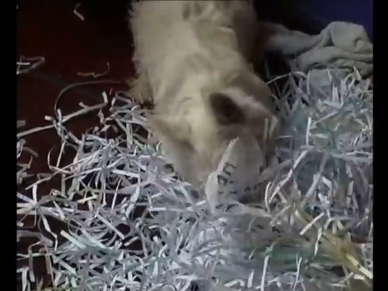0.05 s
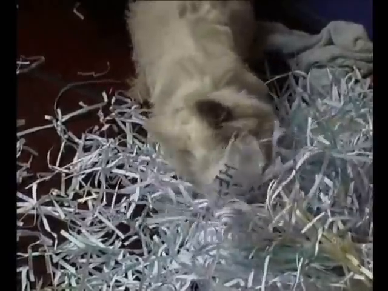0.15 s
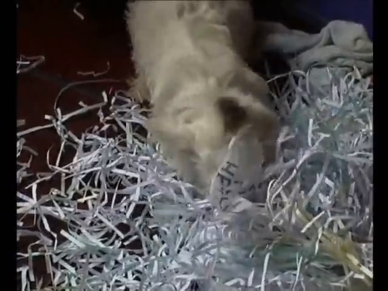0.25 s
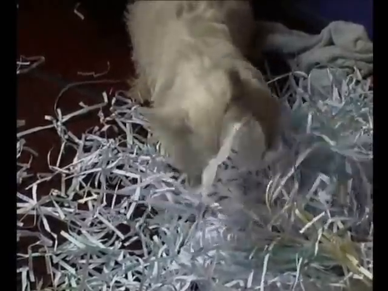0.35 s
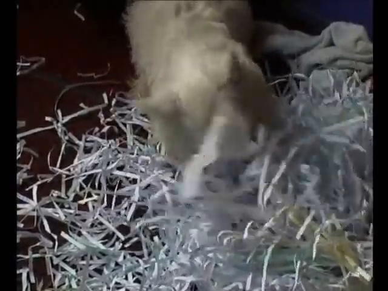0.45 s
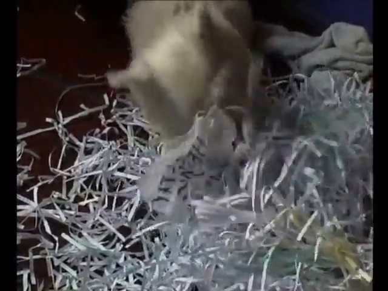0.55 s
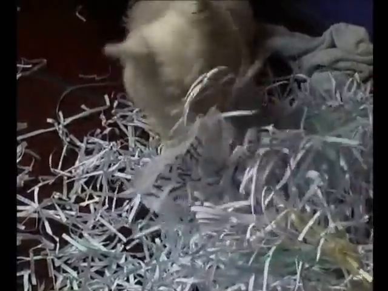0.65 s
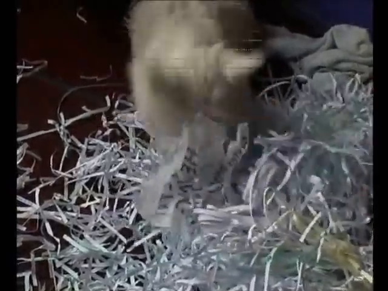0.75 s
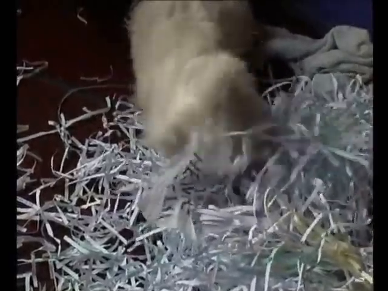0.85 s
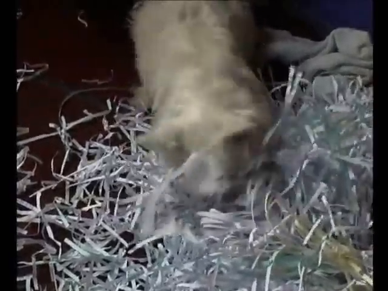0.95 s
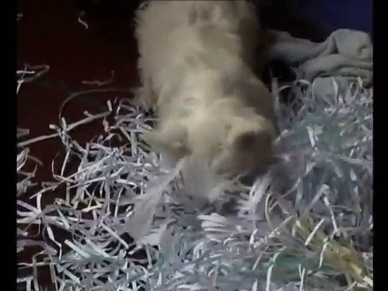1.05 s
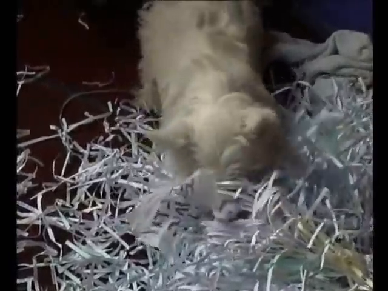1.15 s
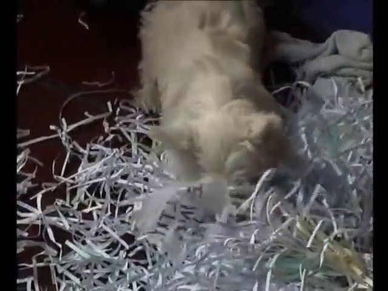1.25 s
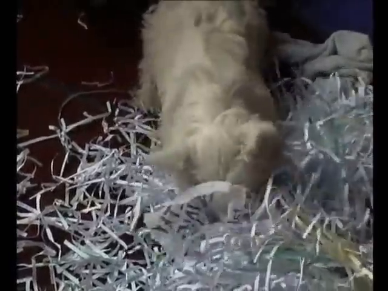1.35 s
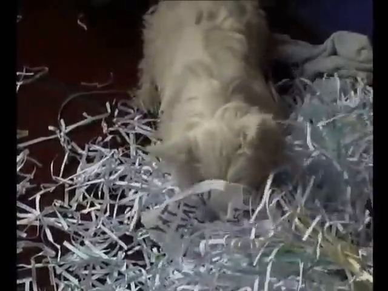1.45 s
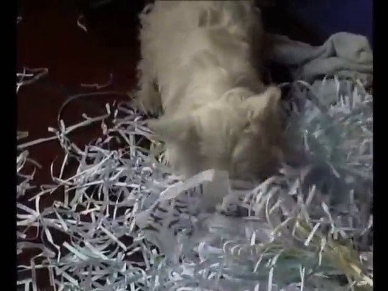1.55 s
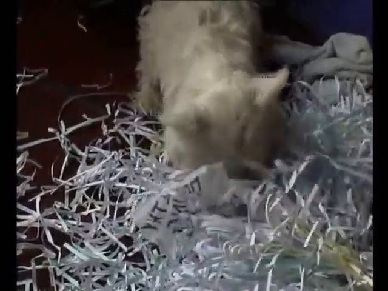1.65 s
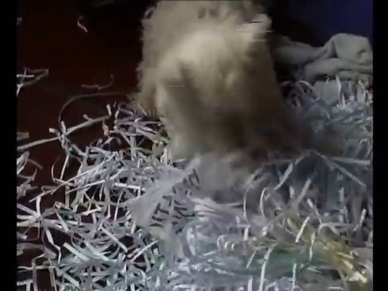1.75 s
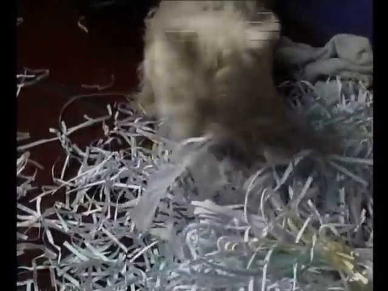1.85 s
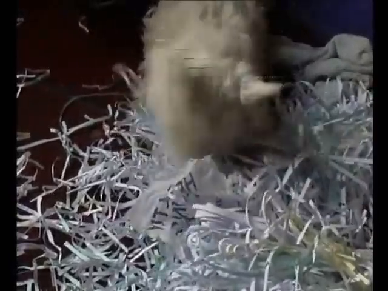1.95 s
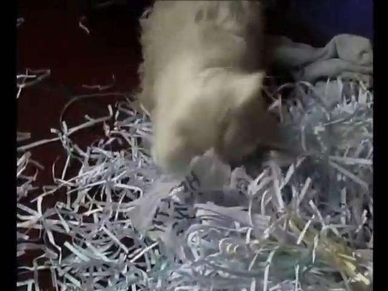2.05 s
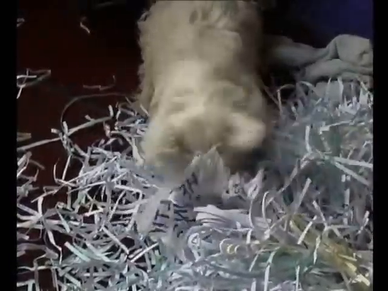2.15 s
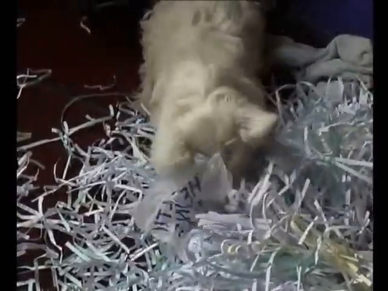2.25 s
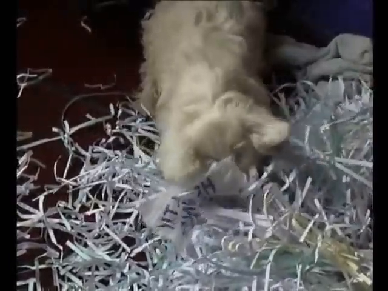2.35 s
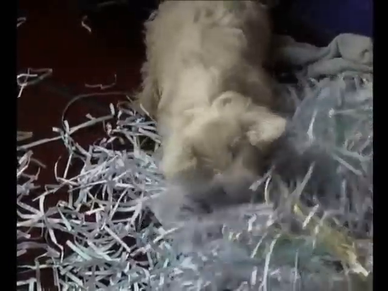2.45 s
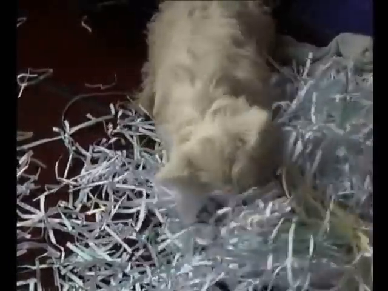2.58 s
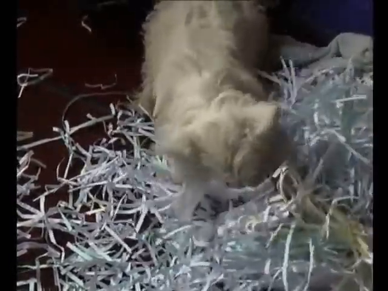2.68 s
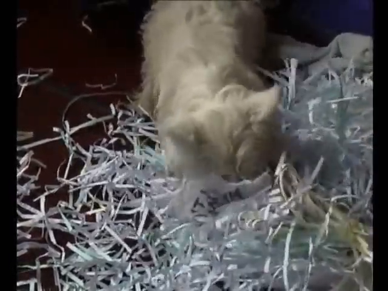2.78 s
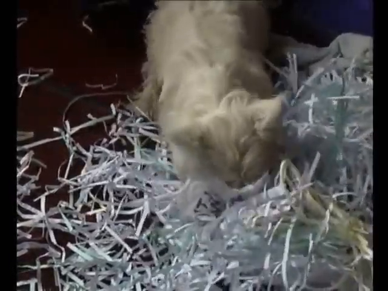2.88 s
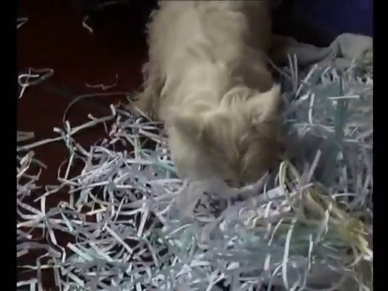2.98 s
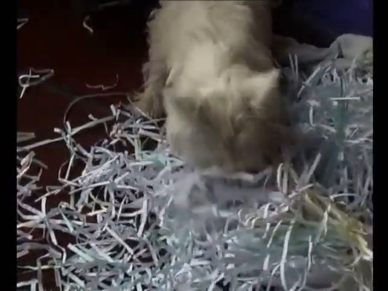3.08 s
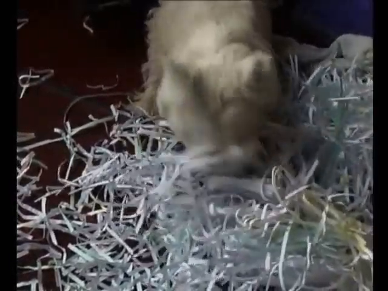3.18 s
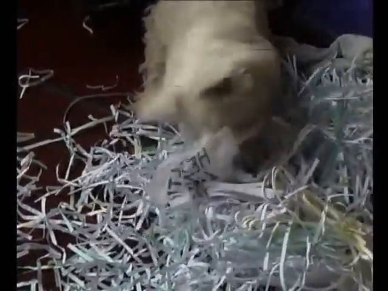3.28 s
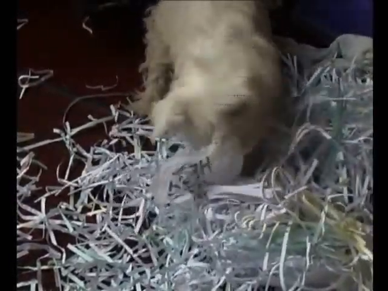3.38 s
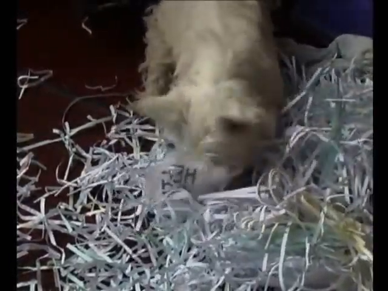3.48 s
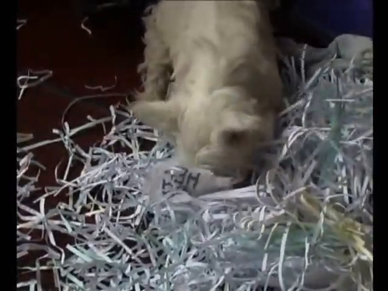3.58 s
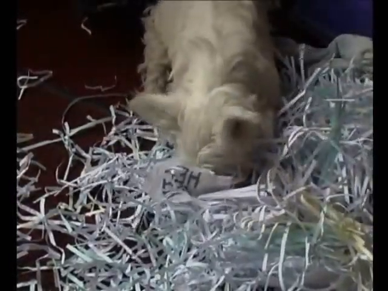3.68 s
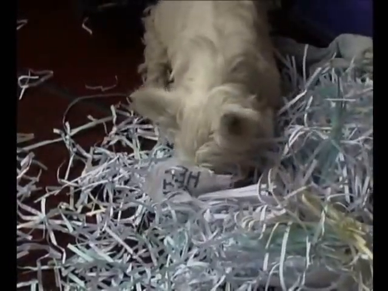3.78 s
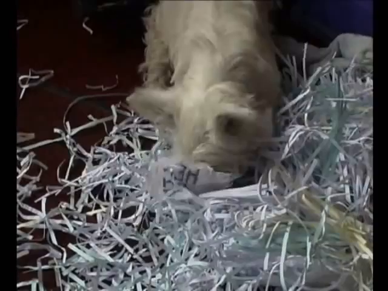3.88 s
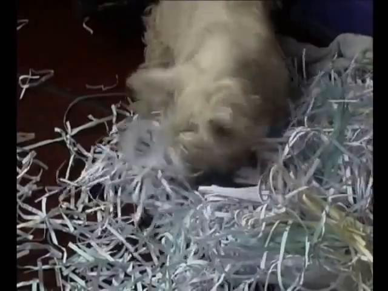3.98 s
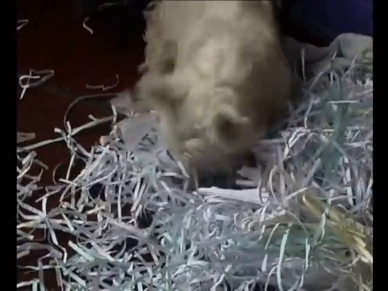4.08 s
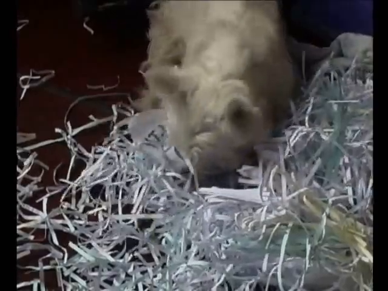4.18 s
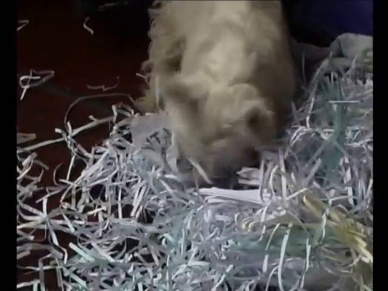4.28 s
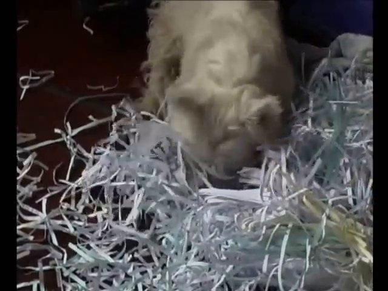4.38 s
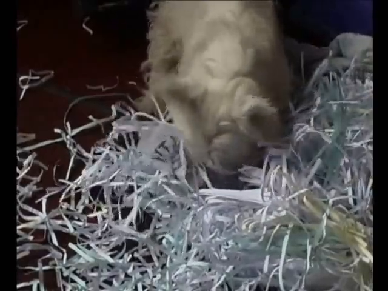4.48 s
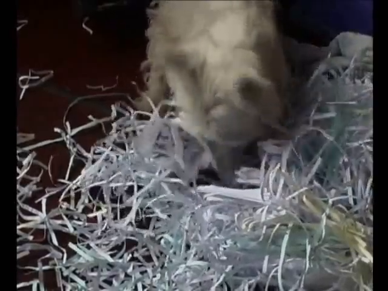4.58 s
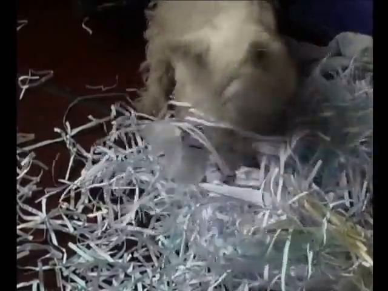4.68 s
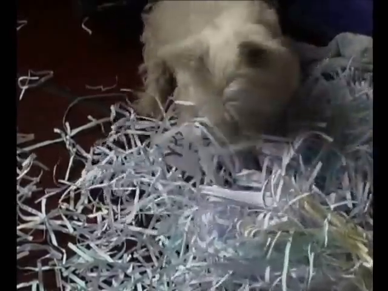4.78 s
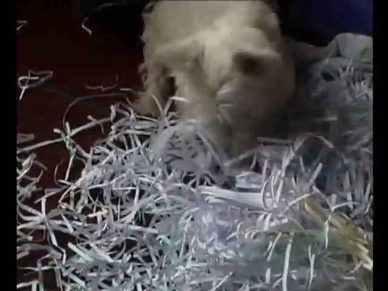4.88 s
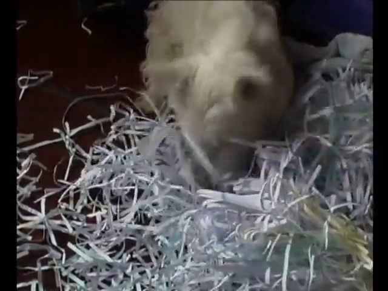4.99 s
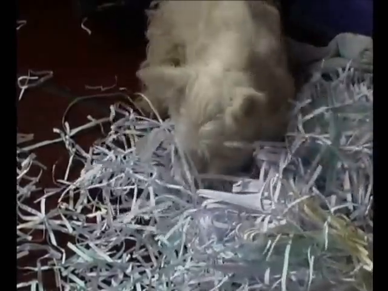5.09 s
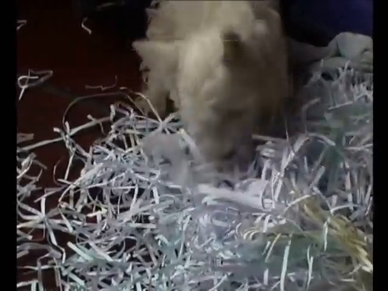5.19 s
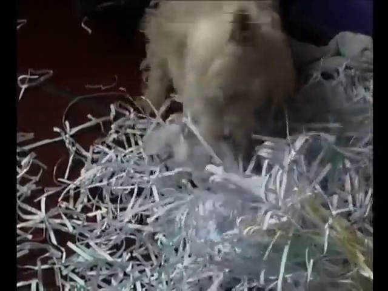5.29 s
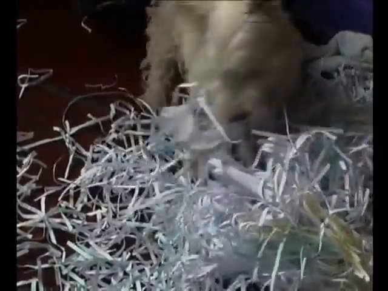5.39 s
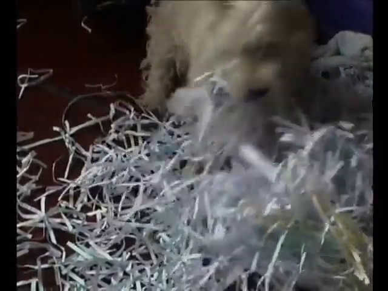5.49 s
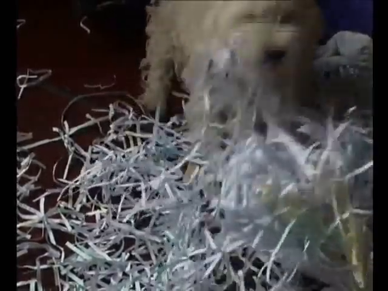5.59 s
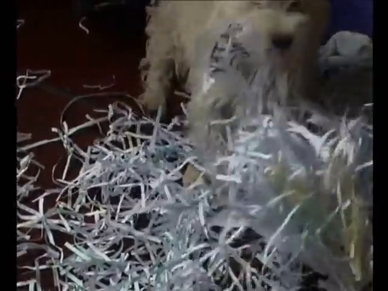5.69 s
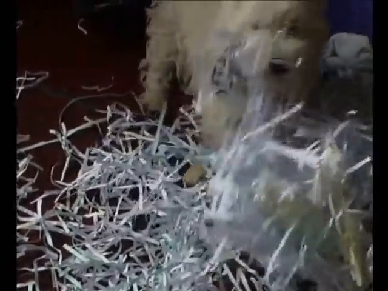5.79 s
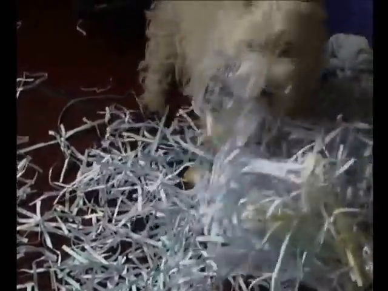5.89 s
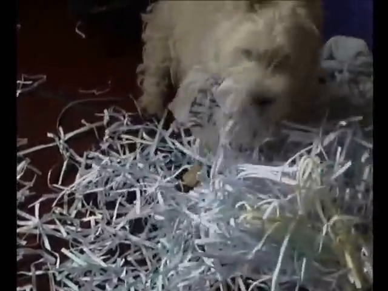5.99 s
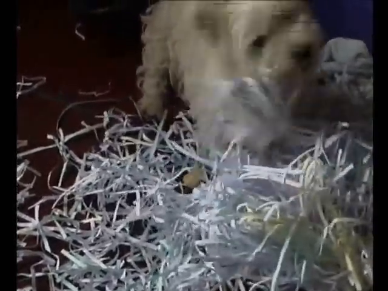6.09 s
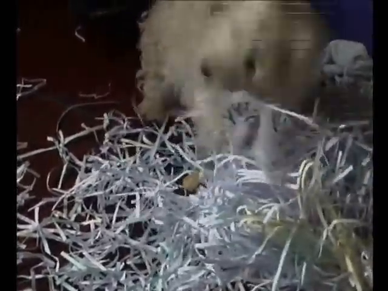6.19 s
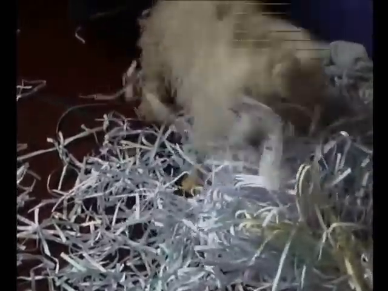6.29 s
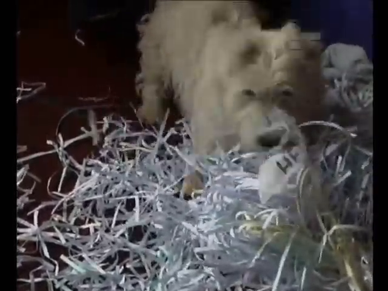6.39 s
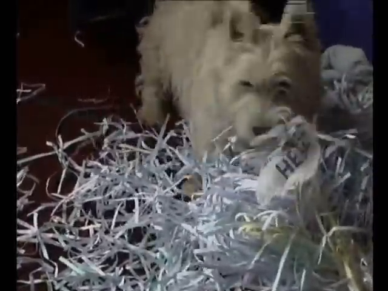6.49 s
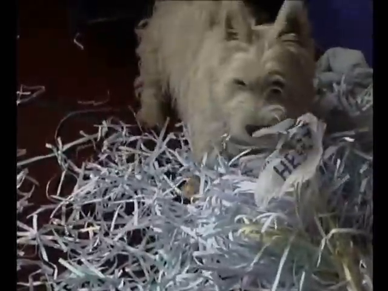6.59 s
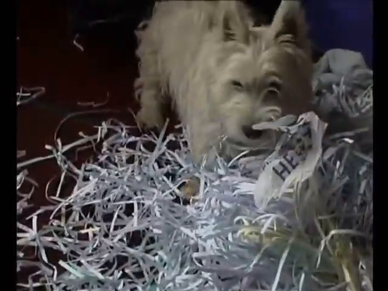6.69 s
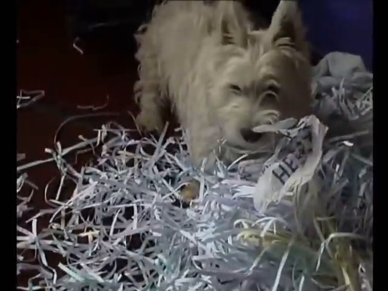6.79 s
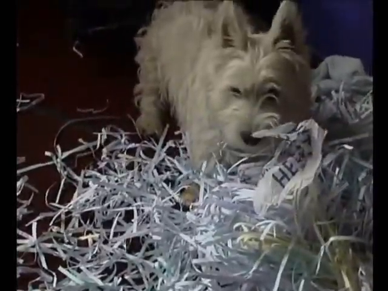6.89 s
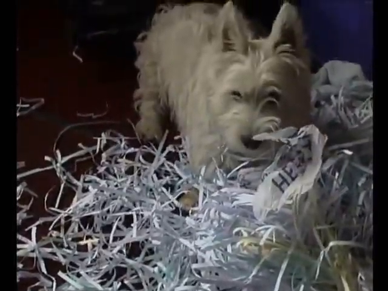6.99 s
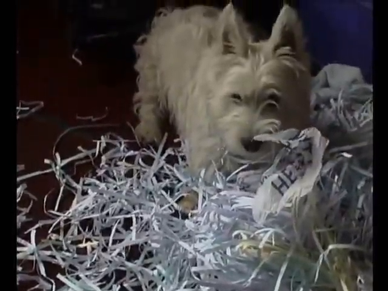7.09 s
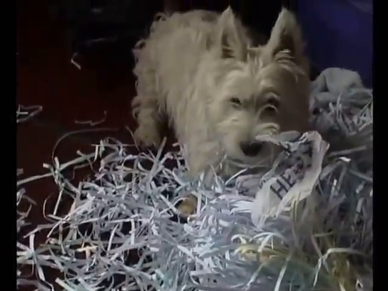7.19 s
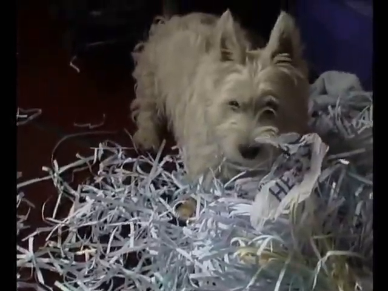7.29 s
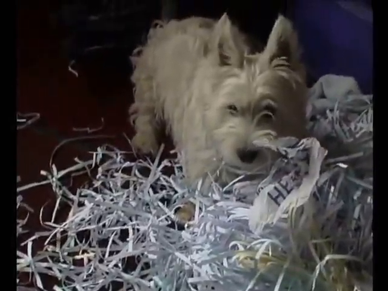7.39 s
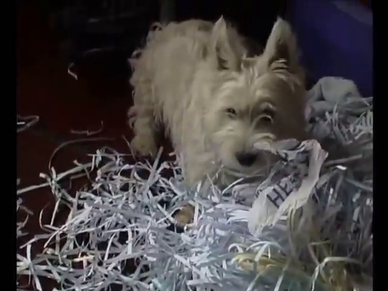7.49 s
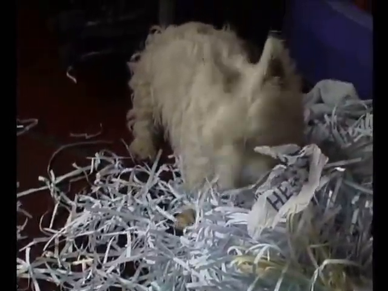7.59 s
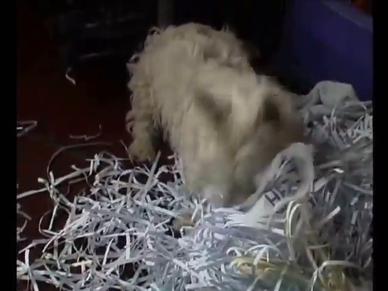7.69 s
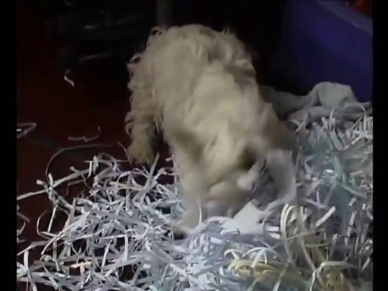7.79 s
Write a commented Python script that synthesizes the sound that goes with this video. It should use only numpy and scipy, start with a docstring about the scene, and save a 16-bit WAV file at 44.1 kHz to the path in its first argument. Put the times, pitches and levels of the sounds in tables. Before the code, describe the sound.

In a small, quiet room, a small dog stirs a heap of shredded paper on a wooden floor about a metre from a stereo microphone. From 0 to 1.2 seconds the strips rustle lightly in uneven shoves. A stronger crackling burst comes near 1.4, with a paw thud and claw tap around 1.8 to 1.9, then the strongest rustles at about 2.5. Shorter strokes continue, dipping briefly near 3.4 and 3.9. Stirring builds from 4.1, with a cluster of knocks and a thud near 4.75. A hard flurry at 5.3 to 5.7 mixes dense crackle, sharp claw taps and snapping strips. Rustling thins out by 6.5, leaving sparse ticks, faint air and a steady low hum. Around 7.1 to 7.7 there are tiny snaps and a soft thud, then a final moderate rustle at 7.8.

```python
"""Small dog in shredded paper

A small dog noses and paws through a heap of shredded paper on a wooden floor, a metre away.
Strips hiss and crackle (filtered noise and random clicks), claws knock (damped floor modes), paws thud
(low decaying sines), kinks snap (noise ticks) and a scrap in its mouth squeaks (resonated slips).
The dog pauses, then dives in again; a low hum (sine) and faint air noise fill the small room."""
import sys
import numpy as np
from scipy import signal
from scipy.fft import rfft, irfft
from scipy.io import wavfile
from scipy.ndimage import uniform_filter1d

SR = 44100
rng = np.random.default_rng(int(sys.argv[2]) if len(sys.argv) > 2 else 0)


def master_out(mix):
    """Clip the mix to full scale and print it as 16-bit PCM to the path in sys.argv[1]."""
    frames = np.transpose(np.atleast_2d(mix))
    ceiling = np.clip(frames, -1, 1)
    pcm = np.round(ceiling * 32767).astype(np.int16)
    wavfile.write(sys.argv[1], SR, pcm)


N = 346185
T = np.arange(N) / SR

# spectrum of the strips: (frequency [Hz], relative density [dB per Hz])
PAPER_SPECTRUM = [(90, -9), (200, -4.5), (350, -6), (480, -4.2), (620, -2.5), (900, -1.5), (1300, -2.5),
                  (1850, 0.5), (2600, -0.1), (4200, -.7), (6700, 0), (8200, -2.5), (10500, -6),
                  (13000, -15)]
# stereo width of the rustle by frequency: (frequency [Hz], side relative to mid [dB])
RUSTLE_WIDTH = [(200, -3.5), (360, -4.5), (660, -10), (1210, -4.5), (2210, -6), (3600, -4.5), (5500, -11),
                (8000, -7.5), (11000, -6.5)]


def rustle():
    """Harder stirring makes more and louder clicks over the hiss of sliding strips."""
    level_db, body_gain, crisp_gain = stirring()
    clicks_per_s = 220 * undb(.7 * (level_db + 55.5))
    grains = crinkle(clicks_per_s, spread_db=3.0, flutter_db=1.5, scatter_db=2.5, scatter_t60_s=0.11)
    slide = undb(2.5) * rng.standard_normal((2, N))
    moving = (grains + slide) * catches(rate_hz=60, t60_s=0.18, depth=0.19)
    mid, side = colour(moving, PAPER_SPECTRUM)
    side = colour(side[None], RUSTLE_WIDTH)
    paper = (mid + side * np.array([[1], [-1]])) / mid.std()
    deep = below(paper, hz=1430)
    crisp = paper - below(paper, hz=8200)
    balanced = paper + (body_gain - 1) * deep + (crisp_gain - 1) * crisp
    return undb(level_db + 1.02) * balanced


# shoves of nose or paw; levels before the overall trim in rustle:
# (time at full force [s], hold [s], level [dB], rise [s], release t60 [s],
#  body of the packed layers [dB], crispness of the strips [dB])
STROKES = [(0.046, 0.01, -57.5, 0.14, 0.31, -1.5, -1), (0.309, 0.01, -58.5, 0.24, 0.17, -2, -3),
           (0.538, 0.12, -50.5, 0.18, 0.6, -0.5, 2.5), (0.912, 0.015, -61.5, 0.21, 0.5, 3.5, 6.5),
           (1.112, 0.12, -53.5, 0.21, 1.4, 0, -1.5), (1.379, 0.019, -42.5, 0.086, 0.55, -2, -4),
           (1.569, 0.1, -51.5, 0.064, 0.76, -2, -2), (1.778, 0.11, -47.5, 0.07, 0.2, -1.5, 1.5),
           (2.102, 0.16, -61.0, 0.22, 0.7, 3, 0.5), (2.367, 0.01, -54.0, 0.07, 0.21, -1.5, -1.5),
           (2.494, 0.01, -47.0, 0.14, 0.31, -1.5, -3.0), (2.56, 0.043, -41.0, 0.12, 0.39, -2.5, -0.5),
           (2.74, 0.13, -52, 0.13, 0.24, -0.5, -0.5), (2.946, 0.032, -48.5, 0.09, 0.39, -0.5, -2.5),
           (3.199, 0.048, -51.5, 0.15, 0.64, 2, -1), (3.385, 0.075, -68, 0.04, 0.42, 8, 6.5),
           (3.499, 0.092, -50.0, 0.053, 0.63, -3, -1.5), (3.855, 0.022, -63.5, 0.028, 0.094, 2.0, -2.5),
           (3.915, 0.015, -65, 0.027, 0.26, 5.0, -1.0), (4.077, 0.057, -47.0, 0.12, 0.55, -1, -0.5),
           (4.24, 0.017, -53.5, 0.037, 0.3, -6.0, 1.5), (4.38, 0.043, -57.0, 0.086, 0.39, -0.5, 2),
           (4.464, 0.042, -51.0, 0.035, 0.54, 0, -0.5), (4.589, 0.017, -49.5, 0.06, 0.76, -0.5, 0.5),
           (4.711, 0.079, -46.5, 0.076, 0.53, 3, 1), (5.04, 0.081, -56, 0.16, 0.36, 0.5, 1),
           (5.148, 0.048, -49.0, 0.04, 0.096, -1.5, 0.5), (5.349, 0.093, -44, 0.2, 0.53, 0.5, -3.5),
           (5.536, 0.21, -43.5, 0.062, 0.26, 0.5, 0), (5.83, 0.12, -54.0, 0.05, 1.01, -0.0, -0.0),
           (6.182, 0.0095, -54.5, 0.065, 0.31, 1.5, -0.5), (6.32, 0.01, -56.5, 0.26, 0.47, 1.5, -1.5),
           (6.393, 0.0093, -59.5, 0.045, 0.85, 4, 2.0), (7.813, 0.1, -53.0, 0.13, 0.4, 2.0, 0)]
# spells of light stirring, muzzle in the heap: (start [s], end [s], level [dB])
NOSING = [(0, 3.76, -64), (4.1, 6.36, -68)]
NOSING_RISE_S, NOSING_RELEASE_T60_S, NOSING_BODY_DB = 0.2, .6, 2
# loose strips thrown up by a movement fall back after it, fainter and crisper
FALLBACK_DB, FALLBACK_T60_S, FALLBACK_CRISP_DB = -18.4, 0.51, 4.5
REST_DB = -88  # faint ticking of the heap left alone


def stirring():
    """Movements add in power; returns heap level [dB] and the gains of its body and crisp top."""
    moves = []
    for s, hold, db, rise, t60, body_db, crisp_db in STROKES:
        moves.append((push(s, hold, db, rise, t60), body_db, crisp_db))
    for start, end, db in NOSING:
        power = push(start, end - start, db, NOSING_RISE_S, NOSING_RELEASE_T60_S)
        moves.append((power, NOSING_BODY_DB, 0))
    pressed = sum(power for power, _, _ in moves)
    loose = undb(FALLBACK_DB) ** 2 * linger(pressed, FALLBACK_T60_S) + undb(REST_DB) ** 2
    total = pressed + loose
    body = sum(power * undb(body_db) ** 2 for power, body_db, _ in moves) + loose
    crisp = sum(power * undb(crisp_db) ** 2 for power, _, crisp_db in moves)
    crisp = crisp + loose * undb(FALLBACK_CRISP_DB) ** 2
    return 10 * np.log10(total), np.sqrt(body / total), np.sqrt(crisp / total)


def push(start_s, hold_s, db, rise_s, t60_s):
    """Power of one movement: amplitude swells evenly, holds and dies away exponentially."""
    swell = np.clip(1 - (start_s - T) / rise_s, 0, 1)
    decay_db = 60 * np.maximum(T - start_s - hold_s, 0) / t60_s
    return (swell * undb(db - decay_db)) ** 2


def crinkle(rate_hz, spread_db, flutter_db, scatter_db, scatter_t60_s):
    """Strips buckle in tiny random clicks in eight broad bands; returns mid and side."""
    out = np.zeros((2, N))
    for hz in np.geomspace(500, 11000, num=8):
        chance, size, sign = rng.random((3, N))
        size = undb(spread_db * np.minimum(-np.log(1 - size), 4.5))
        clicks = unit((chance < rate_hz / SR) * size * np.sign(sign - .5) / np.sqrt(rate_hz))
        place = np.array([np.ones(N), rng.standard_normal(N)])
        # fresh noise per click: scatter through the heap never repeats
        scatter = np.sqrt(linger(clicks ** 2, scatter_t60_s)) * rng.standard_normal((2, N))
        ringing = band(clicks * place + undb(scatter_db) * scatter, hz, q=1.47)
        out += ringing * undb(flutter_db * walk(45))
    return unit(out)


def catches(rate_hz, t60_s, depth):
    """Tangles give way at random: each a sudden surge that dies down."""
    chance, size = rng.random((2, N))
    surge = linger((chance < rate_hz / SR) * size ** 2, t60_s)
    return unit(np.sqrt(1 + depth * surge / surge.mean()))


# claws and hard bits striking the floor:
# (time [s], rms level of first 3 ms before low cut [dB], pitch [Hz], ring time factor)
KNOCKS = [(1.8719, -39, 1930, 1), (2.093, -49.5, 1580, 2), (2.128, -53, 1310, 1.1),
          (4.7368, -35, 745, 0.96), (4.759, -40, 650, 0.66), (4.793, -34, 760, .9), (4.796, -43, 2500, 1.6),
          (4.8497, -42, 1920, .8), (4.854, -43.5, 980, 0.72), (5.3477, -37.5, 2950, 0.63),
          (5.352, -44, 2300, 1), (5.368, -38, 2700, 1.3), (5.428, -35.5, 1370, 0.36),
          (5.4305, -38.5, 1010, .9), (5.514, -36.5, 3100, 0.88), (5.516, -36, 1200, 0.82),
          (5.561, -40, 2600, .8), (5.690, -40, 5030, .7), (6.898, -66, 1650, 1.4)]
# floor modes under a hard tap, before random detuning and ring factor:
# (frequency [Hz], t60 [s], level [dB])
FLOOR_MODES = [(432, 0.013, -10.5), (580, 0.022, -1), (745, 0.0066, -5), (1043, 0.016, -2),
               (1600, 0.015, -10), (1720, 0.018, -5), (2430, 0.0098, -12), (3170, 0.021, -6),
               (5830, 0.011, 0)]


def knocks(click_db=5, crack_db=-4, crack_s=0.0013, rattle_db=-19, rattle_s=.012,
           own_db=-6, own_t60_s=0.018):
    """A tap clicks, rings the floor and the struck bit, and shakes the strips around it."""
    out, t = np.zeros(N), np.arange(SR // 6) / SR
    for s, db, hz, ring in KNOCKS:
        boards = np.zeros(len(t))
        for k, (mode_hz, t60, mode_db) in enumerate(FLOOR_MODES):
            detuned_hz = mode_hz * (1 + 0.045 * rng.standard_normal())
            decay = undb(mode_db - 60 * t / (t60 * ring))
            boards += decay * np.sin(2 * np.pi * detuned_hz * t) * (-1) ** k
        own = undb(own_db - 60 * t / (own_t60_s * ring)) * np.sin(2 * np.pi * hz * t)
        click = undb(click_db) * np.exp(-t / .00006)
        grit = undb(crack_db) * np.exp(-t / crack_s) + undb(rattle_db) * np.exp(-t / rattle_s)
        strike = band(click + grit * rng.standard_normal(len(t)), hz, q=0.65)
        # floor modes near the tap's pitch are favoured
        tap = band(boards, hz, q=1.8) + own + strike
        add(out, s, undb(db) * tap / tap[t < .003].std())
    return out - below(out, hz=325)  # small hard bits carry no bass


# paws and body weight on the boards:
# (time [s], level before onset and decay [dB], pitch [Hz], t60 [s])
THUDS = [(.49, -46.5, 126, 0.12), (.55, -54, 97, .2), (1.794, -45, 169, 0.11), (1.81, -54, 203, .1),
         (1.872, -38, 171, 0.1), (1.875, -50, 91, 0.16), (3.15, -56, 180, 0.14), (4.775, -43.5, 172, 0.18),
         (4.78, -50, 101, 0.26), (5.368, -44.5, 101, 0.14), (5.535, -55, 119, 0.14), (6.28, -60, 79.4, .3),
         (7.35, -59, 75, 0.61), (7.58, -63, 78, .3), (7.668, -48, 79.5, 0.14)]


def thuds(push_s=0.0048, upper_db=-11):
    """A soft pad pushes the boards, which boom briefly with a weaker upper mode."""
    out, t = np.zeros(N), np.arange(SR // 2) / SR
    for s, db, hz, t60 in THUDS:
        upper = undb(upper_db - 60 * t / 1.4) * np.sin(2 * np.pi * 1.526 * hz * t)
        boom = np.sin(2 * np.pi * hz * t) + upper
        add(out, s, boom * (1 - np.exp(-t / push_s)) * undb(db - 60 * t / t60))
    return out


# single strips snapping: (time [s], peak level [dB], centre [Hz])
SNAPS = [(0.132, -55, 5500), (0.595, -44, 4500), (3.895, -61, 3000), (5.024, -46, 3000),
         (5.3477, -43, 6500), (5.4283, -38, 6000), (5.515, -36, 5900), (6.394, -54, 3000),
         (7.133, -59.5, 3200), (7.469, -61, 6500), (7.535, -61, 3000), (7.705, -52, 2500)]


def snaps(decay_s=0.0021):
    """A kinked strip lets go with one dry, broad tick."""
    out, t = np.zeros(N), np.arange(SR // 20) / SR
    for s, db, hz in SNAPS:
        tick = band(rng.standard_normal(len(t)) * np.exp(-t / decay_s), hz, q=1.1)
        add(out, s, undb(db) * tick / np.abs(tick).max())
    return out


# larger scrap creasing and squeaking in the dog's mouth:
# (time [s], length [s], resonance [Hz], sharpness [Q], rms level before swell [dB])
SQUEAKS = [(0.019, 0.085, 2200, 2, -59.5), (1.75, .06, 3200, 2, -46.5), (2.919, 0.067, 2100, 2.2, -56),
           (3.5, 0.18, 1860, 4.4, -56.5), (6.0, .09, 1400, 30, -74), (6.301, 0.18, 8260, 45, -65)]


def squeaks(slips_per_s=1500):
    """The scrap sticks and slips; a quick irregular run of slips rings one sheet resonance."""
    out = np.zeros(N)
    for s, length, hz, q, db in SQUEAKS:
        swell = np.hanning(int(length * SR))
        slips = (rng.random(SR) < slips_per_s / SR) * rng.uniform(-0.97, 1, SR)
        add(out, s, undb(db) * swell * unit(band(slips, hz, q)[:len(swell)]))
    return out


# spectrum of the still room air: (frequency [Hz], relative density [dB per Hz])
AIR_SPECTRUM = [(20, -13), (45, -4), (80, 1.5), (120, -3.5), (200, -11), (330, -14), (600, -14.5),
                (1100, -19.5), (3000, -25), (8000, -27.5), (13000, -28.5)]
AIR_RMS_DB = -70.5
HUM_HZ, HUM_RMS_DB = 150.18, -65.5


def background():
    """A nearly steady appliance hum (sine) over faint air noise, narrower in the bass."""
    side = rng.standard_normal(N)
    side = side - .5 * band(side, 100, q=0.68)
    air = colour(rng.standard_normal(N) + 0.89 * side * np.array([[1], [-1]]), AIR_SPECTRUM)
    hum = np.sqrt(2) * np.sin(2 * np.pi * HUM_HZ * T + np.array([[.3], [-.3]]))
    hum_db = HUM_RMS_DB + 0.28 * walk(6.0) + np.array([[-.35], [.35]])
    return undb(AIR_RMS_DB) * unit(air) + hum * undb(hum_db)


def room(x, wet_db, t60_s, early_db, early_t60_s):
    """Direct sound, quick scatter from floor and furniture, short tail; reflections differ per side."""
    t = np.arange(SR // 2) / SR
    onset = 1 - np.exp(-t / 0.0043)
    out = []
    for side in np.broadcast_to(x, (2, N)):
        decay = undb(-60 * t / np.array([[early_t60_s], [t60_s]]))
        early, late = rng.standard_normal((2, len(t))) * onset * decay
        early = undb(early_db) * early / np.linalg.norm(early)
        late = undb(wet_db) * late / np.linalg.norm(late)
        out.append(side + signal.fftconvolve(side, early + late)[:N])
    return np.array(out)


def undb(db):
    """Decibels to gain."""
    return 10 ** (np.asarray(db) / 20)


def unit(x):
    """Scale to rms 1."""
    return x / np.sqrt(np.mean(x ** 2))


def colour(x, points):
    """Causal filter through (Hz, dB) points, minimum phase via the cepstrum."""
    size = 4096
    hz, db = np.transpose(points)
    gain = undb(np.interp(np.log(np.fft.rfftfreq(size, 1 / SR) + 1), np.log(hz), db))
    cepstrum = irfft(np.log(gain))[:size // 2]
    cepstrum[1:] *= 2
    response = irfft(np.exp(rfft(cepstrum, size)))
    return signal.fftconvolve(x, response[None], axes=1)[:, :N]


def band(x, hz, q):
    """Resonant band-pass, gain 1 at the centre; centre and Q limited."""
    return signal.lfilter(*signal.iirpeak(min(hz, SR / 3), max(q, 3 * hz / SR), fs=SR), x)


def below(x, hz):
    """The part of a sound under hz, gently split, zero phase."""
    return signal.sosfiltfilt(signal.butter(2, min(hz, SR / 3), fs=SR, output="sos"), x)


def walk(rate_hz):
    """Random levels held 1 / rate_hz and smoothed twice; rms 1."""
    k = int(SR / rate_hz)
    steps = np.repeat(rng.standard_normal(N // k + 1), k)
    return unit(uniform_filter1d(uniform_filter1d(steps, k), k)[:N])


def linger(energy, t60_s):
    """Energy dying away exponentially, its sum kept."""
    keep = undb(-120 / (t60_s * SR))
    return signal.lfilter([1 - keep], [1, -keep], energy)


def add(out, s, x):
    """Mix a short sound in at time s."""
    i = int(s * SR)
    out[i:i + len(x)] += x[:N - i]


def scene():
    """Paper, taps and footfalls in the room, over the background."""
    paper = room(rustle(), wet_db=-15, t60_s=.2, early_db=-12, early_t60_s=.035)
    taps = room(knocks() + snaps() + squeaks(), wet_db=-8, t60_s=.22, early_db=-10, early_t60_s=.05)
    steps = room(thuds(), wet_db=-8.5, t60_s=0.39, early_db=-3, early_t60_s=0.074)
    return paper + taps + steps + background()


TOP_HZ = 13150


def record(dry):
    """A steep elliptic low-pass removes the top."""
    return signal.sosfilt(signal.ellip(10, .2, 70, TOP_HZ, fs=SR, output="sos"), dry)


dry = scene()
out = record(dry)
master_out(out)
```